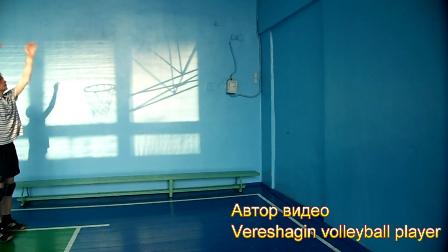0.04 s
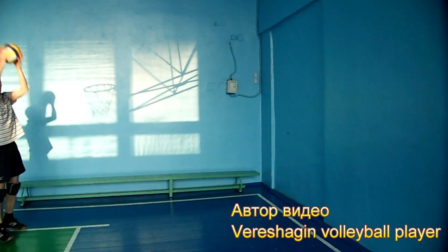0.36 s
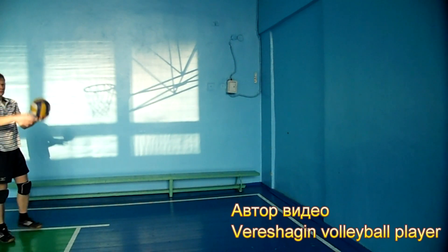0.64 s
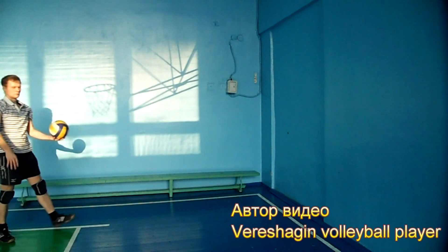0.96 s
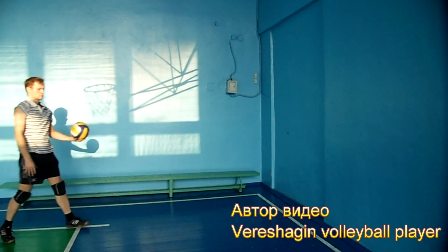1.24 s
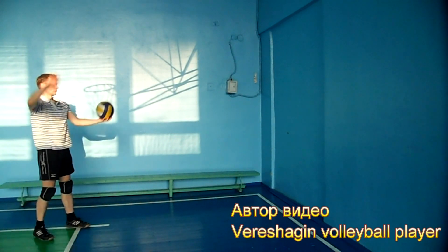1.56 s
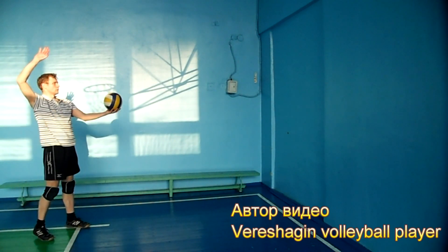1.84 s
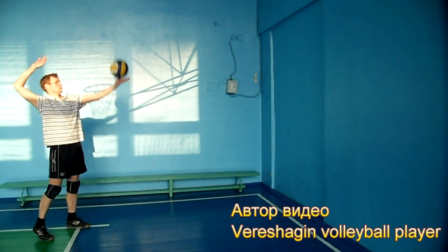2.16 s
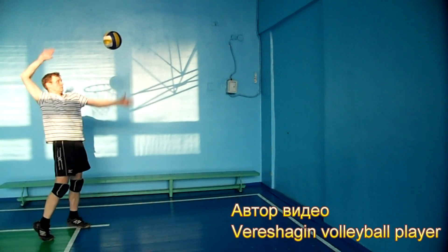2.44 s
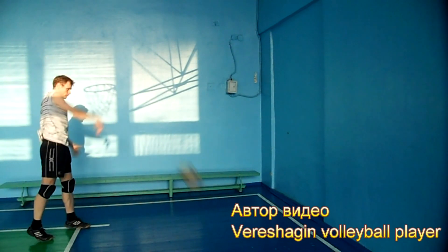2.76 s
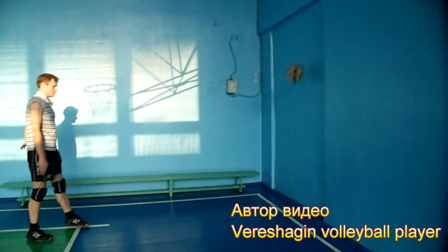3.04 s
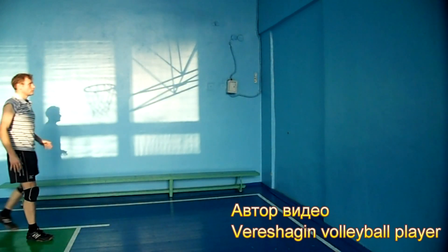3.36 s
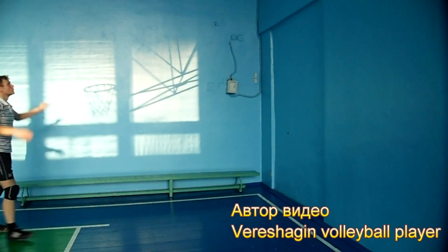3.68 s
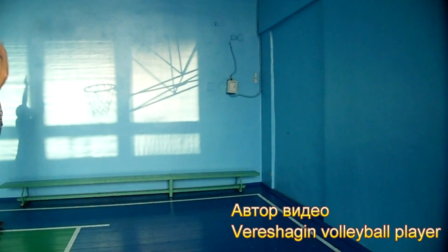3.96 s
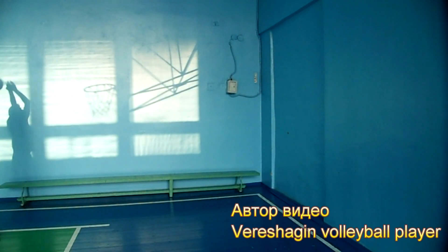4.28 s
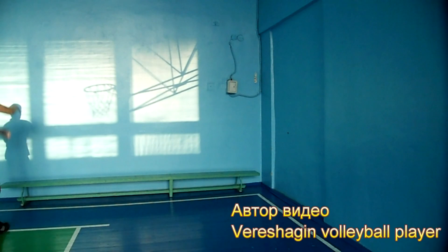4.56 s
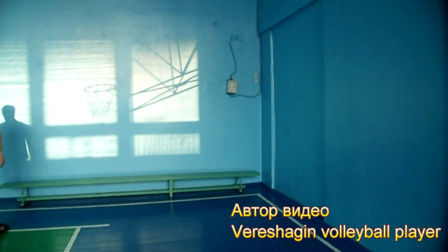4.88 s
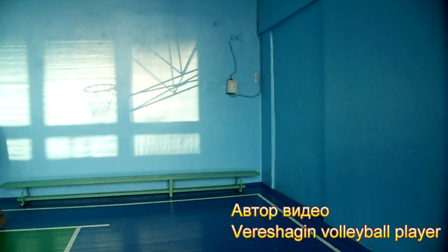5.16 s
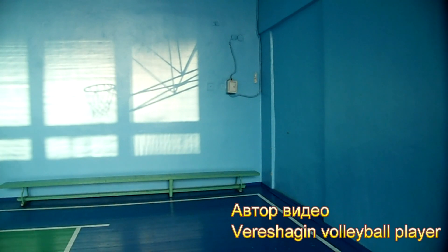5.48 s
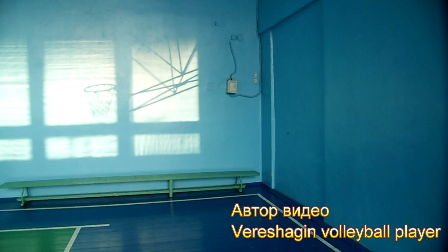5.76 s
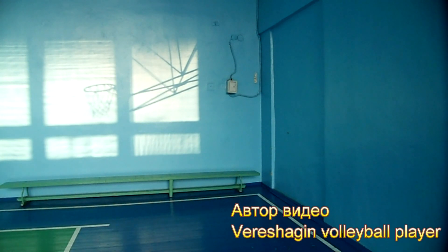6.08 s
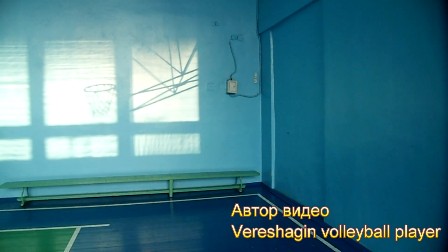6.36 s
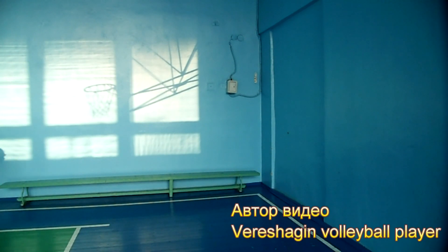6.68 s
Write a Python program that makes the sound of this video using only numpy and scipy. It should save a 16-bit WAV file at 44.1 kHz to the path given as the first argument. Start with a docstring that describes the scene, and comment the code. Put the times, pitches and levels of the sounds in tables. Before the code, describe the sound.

A volleyball is slapped hard, smacks the floor and bounces twice more, echoing through a large empty gym after a few soft steps.

```python
"""A volleyball spike in a large empty gym, on two microphones 16 cm apart with a wall behind them.
At first the hall still rings from the spike before, over a faint hum; hands pat the ball, shoes step, scuff
and squeak, and a low tone swells and fades. Near 2.8 s a hand slaps the ball and it smacks the floor, each
blow throwing sharp echoes off the near floor and walls, then ringing for seconds in the hall.
The ball flies high, lands near 4.9 s and bounces again a second later."""
import sys
import numpy as np
from scipy import signal
from scipy.fft import rfft, irfft
from scipy.io import wavfile

SR = 44100
rng = np.random.default_rng(int(sys.argv[2]) if len(sys.argv) > 2 else 0)


def generate_wav(sig):
    """Save sig (samples, or channels by samples) to the path in sys.argv[1] as 16-bit PCM at SR."""
    pcm = np.round(np.clip(np.atleast_2d(sig).T, -1, 1) * 32767).astype(np.int16)
    wavfile.write(sys.argv[1], SR, pcm)


N = 296352
LEAD = SR   # samples of run-in, so that the hall is already ringing
TOTAL = N + LEAD

# Blows on the ball. Each row: start in seconds, kind of contact, level in dB, thump in Hz, thump in dB
# above the crack, direct sound in dB, left microphone's lag in ms, nearest echo's delay in ms and level
# in dB, back wall echo in dB, far wall echo's delay in ms.
# The first row stops after the thump: only its ring in the hall is heard.
BLOWS = [(-.92, "far", -.2, 100, 4), (2.7780, "hand", -.2, 100, 7, 2, -.07, 4.2, .5, -4.5, 21.5),
         (2.9373, "smash", -.2, 112, 5, 4, .02, 3.0, .5, -3.5, 68.3),
         (4.9405, "bounce", -.4, 112, 6.5, 6.5, -.18, 6.0, -14, -2.5, 29),
         (5.9362, "bounce", -5.3, 85, 7.5, 1.5, -.22, 6.4, -14, 3, 29)]
# Colour of the crack for each kind of contact. Each row: frequency in Hz, level in dB.
CRACK_SPECTRA = { "hand": [(40, -10), (65, -12), (110, 3.5), (250, 7), (500, 2.5), (950, 11), (1300, 12.5),
                 (2100, 11.3), (2700, 7.3), (5000, 9.5), (7000, 3), (10000, -1.5), (14500, -23),
                 (16000, -34)], "smash": [(35, 2), (80, 6.5), (150, 17.5), (220, 9.5), (330, 6.5),
                 (395, 12), (470, 6.5), (620, 3), (820, 9), (1350, 12), (2100, 10.3), (5000, 6.2),
                 (8000, -2.5), (14000, -18), (16000, -30)], "bounce": [(35, -6), (75, -1), (135, 4.5),
                 (210, -5.5), (450, -6), (650, -8.5), (950, -3.5), (1400, -2), (2100, -2), (5000, -4.3),
                 (8000, -13), (14000, -33), (16000, -42)], "far": [(40, 1), (120, 15.5), (200, 11),
                 (420, 5), (700, 6.5), (1250, 11.8), (2100, 7.5), (3500, 4.5), (6000, -4), (14000, -20)], }
# The air in the ball and its skin. Each row: frequency in Hz, width in Hz, level in dB above the crack.
BALL_MODES = [(510, 24, 2), (825, 45, 2.5), (1028, 20, 3.5), (1625, 18, 1.5), (1847, 18, 2), (2089, 22, 2),
              (4543, 18, 3), (5308, 18, 3)]
# The boards where the ball drops. Each row: frequency in Hz, width in Hz, level in dB above the crack.
BOARD_MODES = [(275, 30, 3), (450, 40, 3), (750, 50, 3), (950, 45, 6), (1280, 60, 4), (1385, 30, 3.5),
               (1730, 30, 3), (1910, 40, 3)]
# Punch of the heel of the hand. Each row: frequency in Hz, level in dB.
PALM_SPECTRUM = [(60, -14), (170, 3), (260, 14), (380, 13), (600, -2), (2000, -28), (10000, -55)]
# Thud of the sprung floor. Each row: frequency in Hz, level in dB.
THUD_SPECTRUM = [(35, -9), (70, -3), (110, 1), (160, 3), (280, -5), (600, -15), (2000, -32), (10000, -55)]
# The floor gives under the flattening ball, later for a harder landing.
# Each entry: delay after contact in seconds, thud in dB relative to the blow.
FLOOR_GIVE = {"smash": (.0092, 11), "bounce": (.0066, -.5)}
# Footfalls. Each row: start in seconds, level in dB.
STEPS = [(.42, -21), (1.10, -28), (1.38, -27), (1.58, -26), (4.32, -24)]
# Hands patting the ball. Each row: start in seconds, level in dB, low edge in Hz, decay time in seconds.
PATS = [(.35, -51.3, 4200, .018), (1.596, -54.5, 1900, .012), (4.273, -51, 4700, .02)]
# Soles and clothes scuffing. Each row: start in seconds, level in dB, low edge in Hz.
SCUFFS = [(1.28, -68.5, 1900), (2.66, -67, 1100), (3.89, -70, 4500), (4.11, -70, 4000), (4.72, -68, 3000),
          (5.62, -66.5, 3600)]
# Small dry ticks. Each row: start in seconds, level in dB.
TICKS = [(2.497, -58), (2.597, -53), (3.184, -35), (4.757, -58), (6.614, -53)]
# Resonances of a squeaking sole. Each row: frequency in Hz, time to fall 60 dB in seconds, level in dB.
SQUEAK_MODES = [(3220, .013, -82), (3960, .014, -87)]
# The gym's reverberation. Each row: band centre in Hz, time to fall 60 dB in seconds, level in dB.
HALL_BANDS = [(40, 2.6, -32), (75, 2.4, -32), (140, 1.75, -31.5), (240, 2.55, -31), (400, 4.25, -30.3),
              (800, 5.4, -31), (1350, 5.15, -31.5), (2100, 3.55, -33.4), (3200, 2.5, -33.6),
              (4900, 1.65, -34.7), (7300, 1.1, -36), (11000, .8, -37.5), (16000, .6, -39)]
# Steady air and microphone hiss. Each row: frequency in Hz, density in dB per Hz.
HISS_SPECTRUM = [(25, -101), (55, -101), (100, -105), (200, -110), (500, -112), (1200, -111), (2500, -116),
                 (5000, -120), (8000, -123), (11000, -127), (13000, -134), (16000, -147)]


def ball(thump_width_hz=32, scatter_db=-24.5, scatter_s=.002, size=1024):
    """Each contact cracks, sets the ball's air pinging and thumps; returns near sound and hall feed."""
    near, feed = np.zeros((2, TOTAL)), np.zeros(TOTAL)
    smear = from_db(scatter_db) * np.exp(-np.arange(size) / (scatter_s * SR))
    for start, contact, level_db, thump_hz, thump_db, *place in BLOWS:
        boards = BOARD_MODES if contact == "bounce" else []
        modes = BALL_MODES + boards + [(thump_hz, thump_width_hz, thump_db)]
        blow = from_db(level_db) * pulse(CRACK_SPECTRA[contact], modes)
        add(feed, start, blow)
        if not place:
            continue
        for delay_ms, path_db, lag_ms, pan_db in paths_to_mics(*place):
            # things near each path scatter a short smear behind the sharp front
            _, scatter = diffuse(rng.standard_normal((2, size)))
            fronts = signal.unit_impulse(size) + smear * irfft(scatter)
            for mic, front, side in zip(near, fronts, (1 / 2, -1 / 2)):
                arrival = start + (delay_ms + side * lag_ms) / 1000
                add(mic, arrival, from_db(path_db + side * pan_db) * signal.fftconvolve(blow, front))
    return near, feed


def paths_to_mics(direct_db, lag_ms, near_ms, near_db, back_db, far_ms, back_ms=8.9, shade_db_per_ms=16):
    """A blow and its echoes. Each row: delay in ms, level in dB, left lag in ms, leftward pan in dB."""
    head_on = [(0, direct_db, lag_ms, -shade_db_per_ms * lag_ms),   # louder at the nearer microphone
               (back_ms, back_db, lag_ms, 0)]   # wall behind the microphones
    oblique = [(near_ms, near_db),   # nearest surface
               (near_ms + back_ms, near_db + back_db),   # nearest surface, then back wall
               (39.5, -12.5),   # side wall
               (far_ms, -10.5)]   # far wall
    return head_on + [(ms, db, .1 * rng.standard_normal(), 0) for ms, db in oblique]


def palm(after_s=.002):
    """The heel of the hand punches into the ball just after the slap, heard only close by."""
    track = np.zeros(TOTAL)
    for start, contact, level_db, *_ in BLOWS:
        if contact == "hand":
            add(track, start + after_s, from_db(level_db) * pulse(PALM_SPECTRUM))
    return track


def sprung_floor():
    """The floor gives under feet and ball: dull thuds, too low to differ between the microphones."""
    track, thud = np.zeros(TOTAL), pulse(THUD_SPECTRUM)
    for start, level_db in STEPS:
        add(track, start, from_db(level_db) * thud)
    for start, contact, level_db, *_ in BLOWS:
        if contact in FLOOR_GIVE:
            delay_s, thud_db = FLOOR_GIVE[contact]
            add(track, start + delay_s, from_db(level_db + thud_db) * thud)
    return track


def touches(scuff_s=.07, tick_s=.004, rise_share=.25, max_octaves=2, size=32768):
    """Skin, soles and cloth rub in brief, bright puffs of friction; returns near sound and hall feed."""
    near, feed = np.zeros((2, TOTAL)), np.zeros(TOTAL)
    t = np.arange(size) / SR
    pats = [(*row, 10000) for row in PATS]
    scuffs = [(*row, scuff_s, 8500) for row in SCUFFS]
    ticks = [(*row, 2600, tick_s, 9000) for row in TICKS]
    for start, level_db, low_hz, decay_s, top_hz in pats + scuffs + ticks:
        high_hz = min(top_hz, low_hz * 2 ** max_octaves)   # lower touches are also duller
        band = signal.butter(2, [low_hz, high_hz], "band", fs=SR, output="sos")
        stroke = np.exp(-t / decay_s) * (1 - np.exp(-t / (rise_share * decay_s)))
        rub = from_db(level_db) * stroke * signal.sosfilt(band, rng.standard_normal((2, size)))
        add(near, start, rub)
        add(feed, start, rub[0])
    return near, feed


def squeak(start_s=.96, rise_s=.09, size=32768):
    """A sole drags on the varnish: friction through two narrow resonances swells and dies away."""
    track = np.zeros((2, TOTAL))
    age = np.arange(size) / (rise_s * SR)
    swell = age * np.exp(1 - age)
    for hz, t60, level_db in SQUEAK_MODES:
        whistle = ring(rng.standard_normal((2, size)), hz, t60)
        add(track, start_s, from_db(level_db) * swell * whistle / whistle.std())
    return track


def hall(sound, build_s=.008, early_db=-1.5, early_share=.3, grain_db=4, grain_s=.09, size=2 ** 18):
    """Reflections thicken into a wash; each band drops fast, then lingers between the bare walls."""
    t = np.arange(size) / SR
    spread = np.log(from_db(grain_db)) * np.exp(-t / grain_s)
    grains = np.repeat(rng.standard_normal(size // 32), 32)
    uneven = np.exp(spread * grains - spread ** 2)   # the first reflections stand apart
    hz, wash = diffuse(rng.standard_normal((2, size)) * uneven)
    band_position = at_hz([(centre, k) for k, (centre, _, _) in enumerate(HALL_BANDS)], hz)
    response = np.zeros((2, size))
    for k, (_, t60, level_db) in enumerate(HALL_BANDS):
        band = irfft(wash * np.maximum(1 - abs(band_position - k), 0))
        fall = -np.log(1000) * t / t60
        early = from_db(early_db) * np.exp(np.maximum(fall / early_share, -40))
        response += from_db(level_db) * band * np.hypot(np.exp(fall), early)
    response *= 1 - np.exp(-(t / build_s) ** 2)
    return signal.fftconvolve(sound[None], response, axes=1)[:, :TOTAL]


def room_tone(hum_hz=59.5, hum_db=-85, tone_hz=303, tone_db=-73, peak_s=1.03):
    """Still air, microphone hiss, a faint hum and a low wavering tone that swells and fades."""
    t = np.arange(N) / SR
    hz, air = diffuse(rng.standard_normal((2, N)))
    hiss = irfft(air * from_db(at_hz(HISS_SPECTRUM, hz)), N) * np.sqrt(SR / 2)
    hum = from_db(hum_db) * np.sqrt(2) * np.sin(2 * np.pi * hum_hz * t)
    tone = ring(rng.standard_normal(N), tone_hz, t60=.3)
    swell_db = np.minimum(65 * (t - peak_s), 14 * (peak_s - t))   # rise and fall in dB per second
    return hiss + hum + tone / tone.std() * from_db(tone_db + swell_db)


def pulse(spectrum, modes=(), size=16384):
    """The sharpest causal click (minimum phase) with a given spectrum and ringing modes."""
    hz = np.fft.rfftfreq(size, 1 / SR)
    peaks = sum((from_db(db) ** 2 - 1) / (1 + (2 * (hz - centre) / width) ** 2)
                for centre, width, db in modes)
    log_gain = np.log(from_db(at_hz(spectrum, hz))) + np.log1p(np.maximum(peaks, 0)) / 2
    cepstrum = irfft(log_gain)
    cepstrum[1:size // 2] *= 2
    cepstrum[size // 2 + 1:] = 0
    return irfft(np.exp(rfft(cepstrum)))


def ring(force, hz, t60):
    """One resonance: a click sets a sine ringing, which falls 60 dB in t60 seconds."""
    radius, angle = np.exp(-np.log(1000) / (t60 * SR)), 2 * np.pi * hz / SR
    return signal.lfilter([0, np.sin(angle)], [1, -2 * radius * np.cos(angle), radius ** 2], force)


def diffuse(noise, spacing_m=.16, sound_m_per_s=343):
    """Frequencies and stereo spectrum of sound from all sides: the spaced pair agrees only in the bass."""
    hz = np.fft.rfftfreq(noise.shape[1], 1 / SR)
    alike = .99 * np.sinc(2 * hz * spacing_m / sound_m_per_s)
    mid, side = rfft(noise)
    return hz, np.sqrt(1 + alike) * mid + np.sqrt(1 - alike) * side * [[1], [-1]]


def from_db(db):
    """Decibels to gain."""
    return 10 ** (np.asarray(db) / 20)


def at_hz(points, hz):
    """Read a curve along log frequency."""
    points_hz, values = np.array(points).T
    return np.interp(np.log(np.maximum(hz, 1)), np.log(points_hz), values)


def add(track, start_s, sound):
    """Mix a sound into a track; time zero is the end of the run-in."""
    start = max(round(start_s * SR) + LEAD, 0)
    track[..., start:start + sound.shape[-1]] += sound[..., :TOTAL - start]


def scene(balance_db=-.6, thud_hall_db=-6):
    """Ball, player and floor, near and through the hall; the right microphone is a little louder."""
    ball_near, ball_feed = ball()
    touch_near, touch_feed = touches()
    thuds, sole = sprung_floor(), squeak()
    feed = ball_feed + touch_feed + from_db(thud_hall_db) * thuds + sole[0]
    gym = ball_near + palm() + touch_near + thuds + sole + hall(feed)
    return (gym[:, LEAD:] + room_tone()) * from_db([[balance_db / 2], [-balance_db / 2]])


def record(dry, ceiling=.44, cutoff_hz=15500):
    """The hardest cracks overload the input; the top is cut."""
    rounded = dry / (1 + (dry / ceiling) ** 4) ** (1 / 4)
    lowpass = signal.ellip(10, .2, 80, cutoff_hz, fs=SR, output="sos")
    return signal.sosfilt(lowpass, rounded)


dry = scene()
out = record(dry)
generate_wav(out)
```